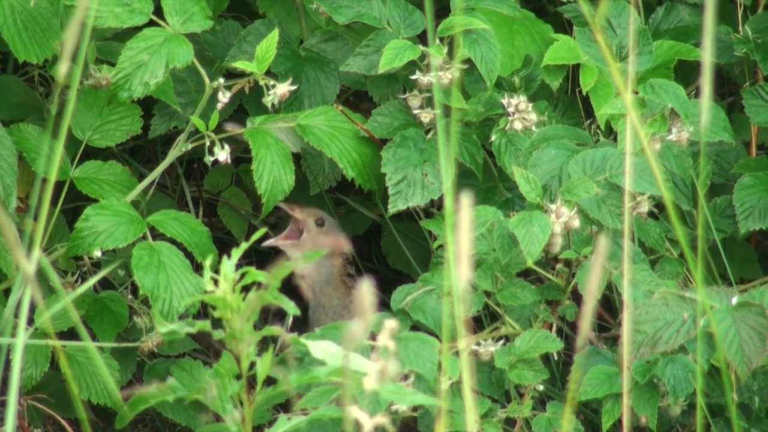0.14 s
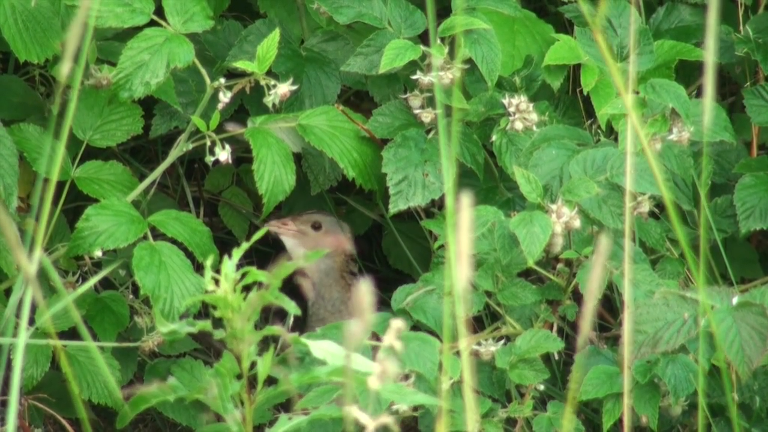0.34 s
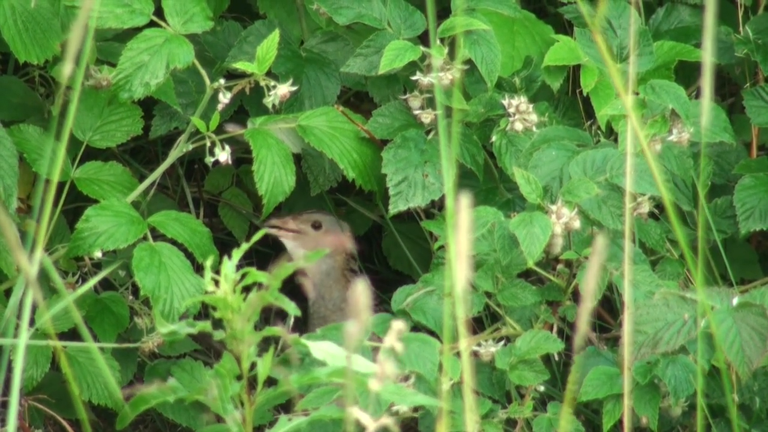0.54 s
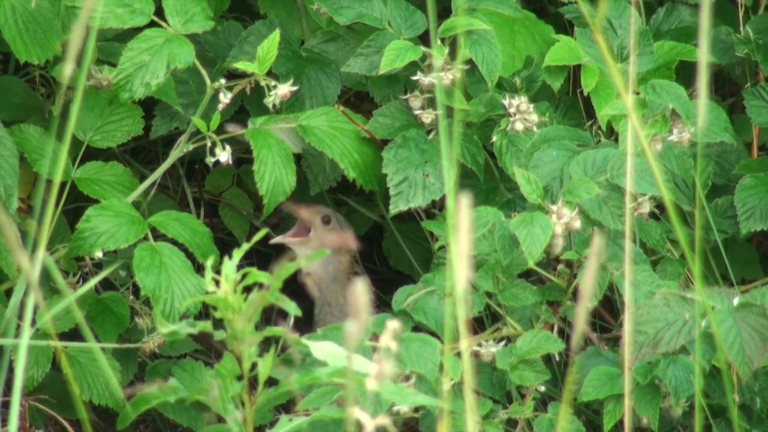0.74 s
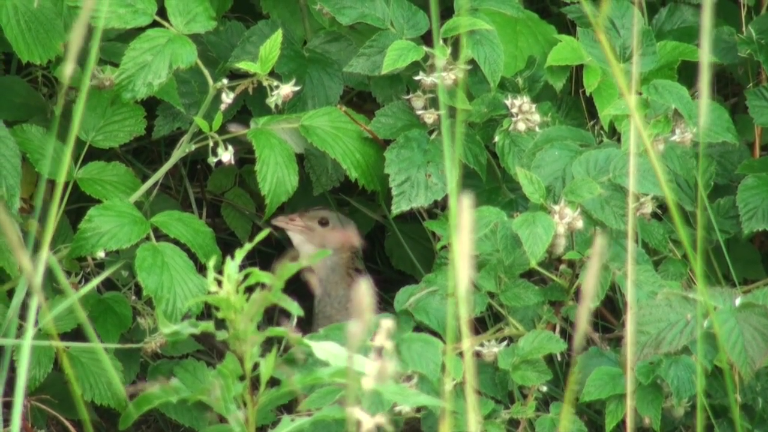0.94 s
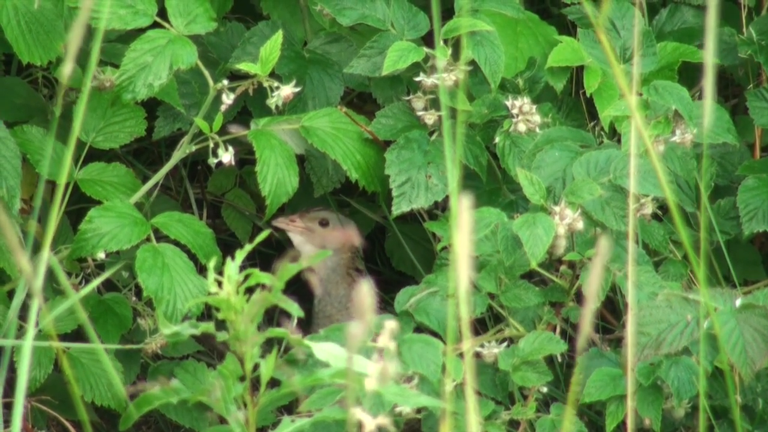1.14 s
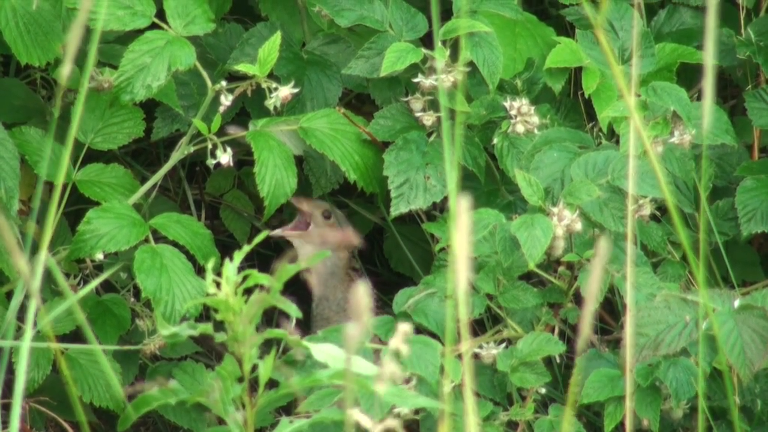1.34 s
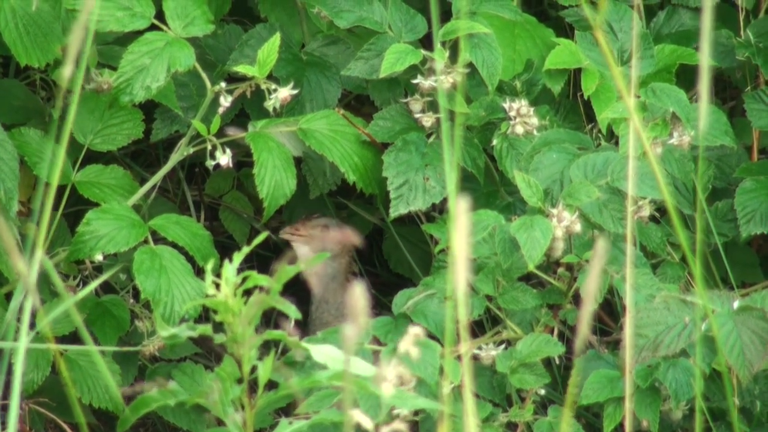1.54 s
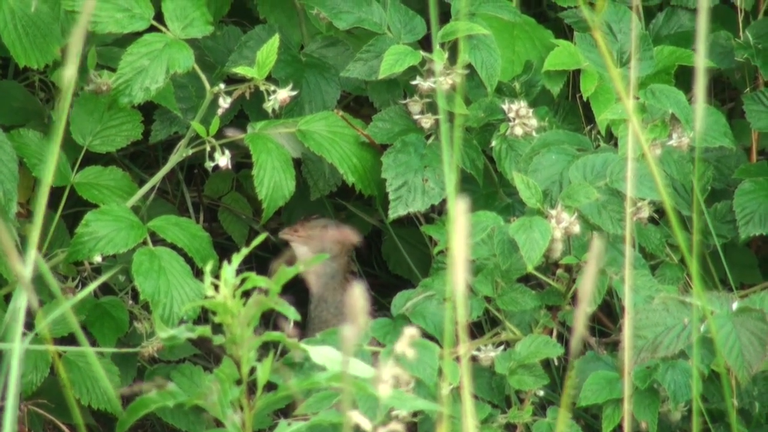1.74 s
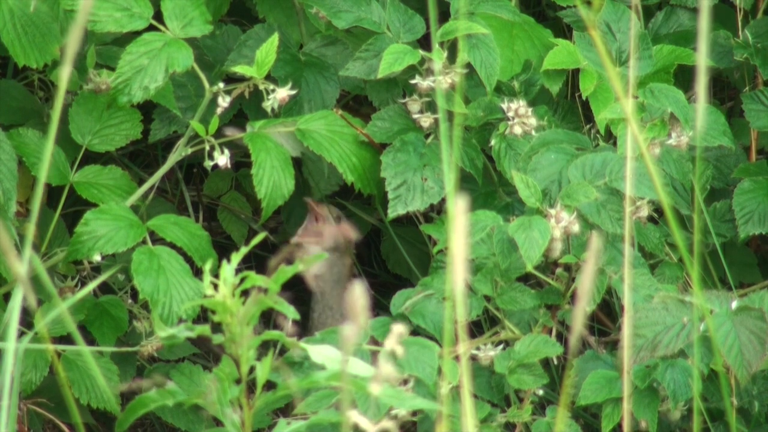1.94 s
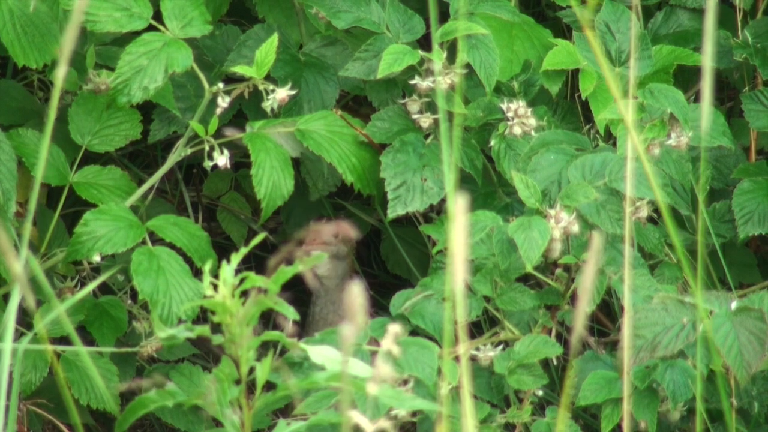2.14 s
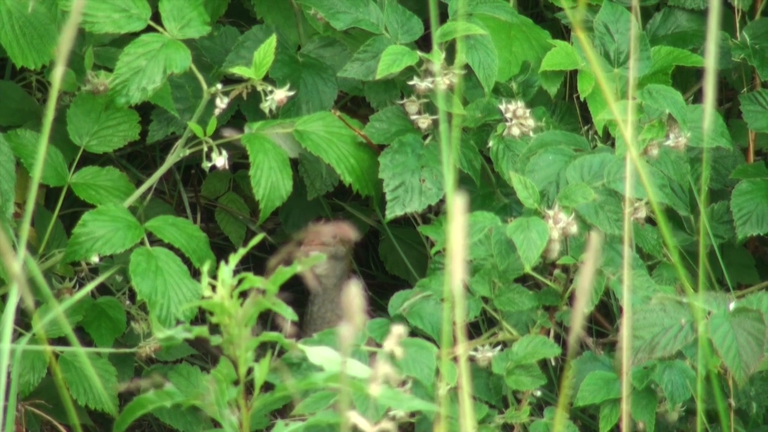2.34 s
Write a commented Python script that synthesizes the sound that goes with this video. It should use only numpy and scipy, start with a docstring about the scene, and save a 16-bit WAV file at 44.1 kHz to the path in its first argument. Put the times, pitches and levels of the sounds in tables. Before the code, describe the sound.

Four loud dry rattling calls, each a quick train of bright clicks like a thumbnail drawn along a comb, from a bird in brambles near the microphone; faint distant answers, thin late chirps, quiet wind and traffic haze.

```python
"""Bramble patch outdoors: a rail close by calls four rasping syllables; a second one answers far off.
Each syllable is an uneven train of pulses, each pulse a sum of brief partials from a few cycles
near 1 kHz up to a bright click, with a little air noise.
Small songbirds whistle faintly as gliding sines over a soft noise haze and a mains hum."""
import sys
import numpy as np
from scipy import signal
from scipy.fft import rfft, irfft
from scipy.io import wavfile
from scipy.ndimage import uniform_filter1d

SR = 44100
rng = np.random.default_rng(int(sys.argv[2]) if len(sys.argv) > 2 else 0)


def attenuation_scalar(level_db):
    """Turn a level in dB into a linear amplitude multiplier (20 dB per decade)."""
    decades = np.asarray(level_db, float) / 20
    return 10 ** decades


def int16_out(signal):
    """Quantize to a 16-bit WAV file."""
    q = np.round(np.clip(np.atleast_2d(signal).T, -1, 1) * 32767)
    wavfile.write(sys.argv[1], SR, q.astype(np.int16))


N = 105840
PULSE_SAMPLES = 512
LEAD_MS = .85  # low partials start this long before the click

# Closing pulses of the four syllables. Each row: pulse times in ms after the syllable start, before stretch.
CLOSINGS_MS = [
    [139.3, 149.4, 158.0, 171.0],
    [138.0, 147.8, 154.9, 163.7, 173.4, 181.9, 193.3],
    [139.1, 149.0, 156.8, 166.6],
    [138.4, 147.6, 154.8, 163.6, 173.2, 181.9, 192.7],
]


def evened(x):
    """Scales to unit rms."""
    return x / np.sqrt(np.mean(x ** 2) + 1e-20)


def colour(x, points):
    """Filters the last axis by a (Hz, dB) curve, linear in log frequency."""
    f, db = np.transpose(points)
    hz = np.fft.rfftfreq(x.shape[-1], 1 / SR)
    gain = attenuation_scalar(np.interp(np.log(hz + 1), np.log(f), db))
    return irfft(rfft(x) * gain, x.shape[-1])


def add(mix, start_s, sound):
    """Adds a sound in place, cut at the end of the mix."""
    part = mix[round(start_s * SR):][:len(sound)]
    part += sound[:len(part)]


def wander(length, size):
    """Smoothed noise of unit rms: a slow random level curve."""
    return evened(uniform_filter1d(rng.standard_normal(length), size=size))


def scatter(x, t60_s, turns_hz):
    """Dense echoes dying at t60; three tails take turns so that like pulses get unlike echoes."""
    t, out = np.arange(SR) / SR, np.zeros(len(x))
    for k in range(3):
        tail = rng.standard_normal(len(t)) * attenuation_scalar(-60 * t / t60_s) * (t > .0015)
        turn = turns_hz * np.arange(len(x)) / SR + k / 3
        share = np.sqrt(2 / 3) * np.cos(2 * np.pi * turn)
        out += signal.fftconvolve(x * share, tail / np.linalg.norm(tail))[:len(x)]
    return out


def haze():
    """Distant wind and traffic, slowly swelling, nearly alike on both sides; wavering hum and low murmur."""
    # Haze spectrum. Each row: frequency in Hz, density in dB per Hz (relative).
    haze_curve = [(20, -12), (70, -6.5), (120, -10), (200, -6), (450, 0.5), (800, -2.5), (1200, -6.5),
                  (2200, -18.5), (4000, -13.5), (6500, -17.5), (8000, -24), (15300, -29), (16500, -57.5)]
    # Left-right difference under the haze. Each row: frequency in Hz, gain in dB.
    apart = [(30, -1), (120, -10), (300, -39), (1000, -27), (6000, -23), (12000, -5)]
    haze_db, swell_db = -50.5, .8
    hum_hz, hum_db, hum_waver_db = 50, -57.5, 2
    murmur_hz, murmur_db, murmur_waver_db = 461.4, -66.5, 7.5

    a, b, c = rng.standard_normal((3, N))
    mid = attenuation_scalar(haze_db + swell_db * wander(N, 5000)) * evened(colour(a, haze_curve))
    side = attenuation_scalar(haze_db) * colour(evened(colour(b, haze_curve)), apart)
    band = [(murmur_hz - 60, -40), (murmur_hz, 0), (murmur_hz + 60, -40)]
    mid = mid + attenuation_scalar(murmur_db + murmur_waver_db * wander(N, 6000)) * evened(colour(c, band))
    hum = np.sin(2 * np.pi * hum_hz * np.arange(N) / SR)
    hum = hum * attenuation_scalar(hum_db + hum_waver_db * wander(N, 4000))
    hum_sides = attenuation_scalar(np.array([[.6], [-.6]]))  # slightly louder on the left
    return np.array([mid + side, mid - side]) + hum * hum_sides


def songbirds():
    """Short gliding whistles that flicker in level, and one rough churr of band noise, lightly echoed."""
    # Each row: start in seconds, length in seconds, from Hz, to Hz, level in dB before a x1.2 gain.
    whistles = [(1.199, .025, 4470, 4340, -62), (1.743, 0.028, 3040, 3080, -52),
                (1.828, 0.012, 5400, 5570, -59), (1.842, 0.058, 2940, 3010, -57),
                (1.845, .022, 4550, 4700, -54), (1.892, 0.016, 4750, 4360, -51),
                (2.148, 0.05, 5140, 4010, -42), (2.258, 0.038, 4750, 4620, -51),
                (2.275, 0.046, 3130, 1910, -52.5), (2.294, 0.017, 4720, 4760, -41),
                (2.318, 0.018, 5240, 5500, -51), (2.338, .009, 5540, 5570, -50),
                (2.325, 0.048, 3150, 1695, -53), (2.352, 0.045, 5560, 4530, -46.5)]
    # Churr spectrum. Each row: frequency in Hz, gain in dB.
    churr_curve = [(3000, -36), (3500, -2), (3850, -9), (4250, -0.5), (4700, -36.5)]
    warble_db, wet_db, t60_s = 3.5, -11, .1
    churr_start_s, churr_length_s, churr_db = 1.774, .038, -41.5

    out, t = np.zeros(N), np.arange(SR // 10) / SR
    for start_s, length_s, from_hz, to_hz, db in whistles:
        u = np.minimum(t / length_s, 1)
        turns = np.cumsum(from_hz + (to_hz - from_hz) * u) / SR
        level = attenuation_scalar(db + warble_db * wander(len(t), 110))
        swell = np.sqrt(abs(np.sin(np.pi * u ** 1.4)))
        add(out, start_s, 1.2 * level * swell * np.sin(2 * np.pi * turns))
    churr = evened(colour(rng.standard_normal(len(t)), churr_curve))
    swell = np.sin(np.pi * np.minimum(t / churr_length_s, 1) ** 0.59)
    add(out, churr_start_s, attenuation_scalar(churr_db) * churr * swell)
    return out + attenuation_scalar(wet_db) * scatter(out, t60_s, turns_hz=2.8)


def pulse(db, treble_db, tune, firm):
    """Low partials swell and stop, pitch creeping up; a bright click rings on, late when dull; air rasps along."""
    # Each row: frequency in Hz, level in dB, rise in ms, fall in ms, share of the treble change (0 to 1).
    partials = [(162, -25.5, 1.4, 0.35, 0.064), (1059, -10.5, 0.99, 3.38, .05),
                (2088, -0.27, 1.51, 2.61, 0.02), (3080, -14, .9, 3.13, 0.072),
                (4060, -12.5, 0.67, 2.9, 0.17), (4520, -17, 1, 3.4, 0.42), (5140, -10, .2, .35, 1),
                (5728, -6.5, 0.21, 2.65, .8), (6186, 3, 0.17, 0.32, 0.89), (6520, -12.5, 0.37, 2.2, 0.92),
                (7070, -17.5, 0.17, 1.4, .8), (8050, -26, 0.47, 1.4, 0.9), (9166, -22.5, 0.56, 1.64, 0.9),
                (10360, -21.5, .35, 1.4, 0.73), (12900, -35.5, .3, 1, 1), (14200, -37, .3, 1.2, 0.84)]
    # Colour of the air noise. Each row: frequency in Hz, density in dB per Hz (relative).
    air_curve = [(350, -79), (600, -51), (984, -2), (1590, -20), (1800, 7), (2090, 5), (2720, 6),
                 (3080, -35), (3530, -63), (4050, -14), (4780, -21.5), (6370, -21), (7620, -41),
                 (9360, -15), (16000, -21.5)]
    rasp_db, rasp_ms = -23, 1.6
    pitch_spread, level_spread_db = .005, .7
    phase_spread, treble_phase_spread = .12, .5  # radians; radians per ms of fall
    glide_per_ms = .068  # fractional pitch rise of a low partial when firm; half of it when not
    dull_db, lag_ms_per_db = -5, .35  # treble below dull_db delays the click
    short_share = .3  # low partials are this much shorter when not firm

    ms = np.arange(PULSE_SAMPLES) * 1000 / SR
    hz, part_db, rise_ms, fall_ms, share = np.transpose(partials)[:, :, None]
    low = 1 - share
    luck = rng.standard_normal((3, len(partials), 1))

    pitch_hz = hz * (1 + low * tune + pitch_spread * (luck[0, 0] + luck[0] / 2))
    glide = low * glide_per_ms * (1 + firm) / 2
    turns = pitch_hz * (ms + glide * (ms - 5) * ms / 2) / 1000

    delay_ms = share * (LEAD_MS - lag_ms_per_db * min(treble_db - dull_db, 0))
    age = np.maximum(ms - delay_ms, 0) / (1 - short_share * low * (1 - firm))
    onset = (age / rise_ms) ** 2
    decay = np.exp(-(age / (rise_ms + fall_ms)) ** (3 - 2 * share))  # low stops, treble rings on
    shape = onset / (1 + onset) * decay
    shape = shape / shape.max(1)[:, None]

    phase = (phase_spread + treble_phase_spread * share ** 2 * fall_ms) * luck[2]
    level = attenuation_scalar(part_db + share * treble_db + level_spread_db * luck[1])
    tone = level * shape * np.cos(2 * np.pi * turns + phase)
    air = evened(colour(rng.standard_normal(PULSE_SAMPLES), air_curve))
    air = air * ms / rasp_ms * np.exp(1 - ms / rasp_ms)
    return attenuation_scalar(db) * (tone.sum(0) + attenuation_scalar(rasp_db) * air)


def syllable(stretch, k):
    """Opening rhythm, then closing k; pitch drifts up and drops on the last pulse, pulses grow firmer."""
    # Rhythm that opens every syllable: pulse times in ms after the start, before stretch.
    opening_ms = [.7, 7.0, 14.1, 23.8, 31.5, 40.1, 50.3, 56.8, 66.2, 73.6, 81.6, 91.4, 97.9, 107.1, 114.1,
                  122.4, 131.7]
    # Accents of the opening pulses. Each row: level in dB, treble in dB.
    accents = [(.5, -8.5), (2.5, -5.5), (-.5, 0), (-1.3, 1), (-1.3, 0), (-1.3, 1), (-1, 1), (.5, -4),
               (0, 1), (0, 0), (.5, 0), (0, 0), (.5, -5), (.3, 0), (.5, -4), (.5, -.5), (0, 0)]
    # Accents of each closing's pulses, one list per closing. Each row: level in dB, treble in dB.
    closing_accents = [
        [(0, -1), (0, 0), (-1.5, -2), (-12, -3)],
        [(.5, -2), (0, 0), (.5, -2), (-.5, 0), (-.5, 0), (-1, -2), (-3, -2)],
        [(0, -1), (0, 0), (-.5, -2), (-1.5, -1)],
        [(0, -2), (0, 0), (.5, -2), (-.5, 0), (-.5, 0), (-.5, -2), (-4, -2)],
    ]
    # Dips between the partials. Each row: frequency in Hz, gain in dB.
    throat_cut = [(260, 0), (340, -14), (620, -14), (800, 0), (1250, 0), (1500, -2), (1720, 0), (3200, 0),
                  (3400, -9), (3750, -9), (3900, 0), (4600, 0), (4800, -5), (5050, 0), (7300, 0),
                  (7600, -9), (7900, 0)]
    time_spread_ms, firm_ms = .05, 90
    drift_per_ms, last_drop = .00018, .11  # fractions of the pitch

    out = np.zeros(SR // 4)
    times_ms = opening_ms + CLOSINGS_MS[k]
    for ms, (db, treble_db) in zip(times_ms, accents + closing_accents[k]):
        tune = drift_per_ms * (ms - 90) - last_drop * (ms == CLOSINGS_MS[k][-1])
        firm = 1 - np.exp(-ms / firm_ms)
        at_ms = 1 + stretch * ms + time_spread_ms * rng.standard_normal()  # 1 ms of room, cut below
        add(out, at_ms / 1000, pulse(db, treble_db, tune, firm))
    fade = np.minimum(np.arange(len(out))[::-1] / PULSE_SAMPLES / 3, 1) ** 2
    return (fade * colour(out, throat_cut))[SR // 1000:]


def far_rail():
    """The same kind of syllable, thinned and smeared by distance."""
    # Each row: start in seconds, level in dB before dry gain and swell, fade in dB per second.
    calls = [(.022, -37, -19), (1.236, -36.5, -26), (1.917, -38, -2)]
    # Distance colour. Each row: frequency in Hz, gain in dB.
    distance = [(900, -16), (2000, -25.5), (2700, -53), (3300, 5.5), (4200, -7), (5200, 2), (5800, -12.5),
                (6400, 1.4), (7600, -11.5), (8300, -20)]
    swell_s, t60_s, dry_db = .057, .27, -6.5

    voice, t = np.zeros(N), np.arange(SR // 4 - SR // 1000) / SR
    for start_s, db, fade_db in calls:
        call = evened(colour(syllable(0.92, 1), distance))
        swell = 1 - 0.55 * np.exp(-t / swell_s)
        add(voice, start_s, attenuation_scalar(db + fade_db * t) * swell * call)
    return attenuation_scalar(dry_db) * voice + scatter(voice, t60_s, turns_hz=13)


def near_rail():
    """Four syllables, their echoes, and the slow baseline swing each causes in the microphone."""
    # Each row: start in seconds, stretch of the rhythm (factor).
    calls = [(.1747, 1.004), (.6944, .997), (1.4287, 1.0), (1.9437, 1.004)]
    # Each row: syllable level in dB, baseline jump in dB.
    efforts = [(-6.5, -29), (-6.5, -30.5), (-6.5, -29), (-7, -30)]
    # Foliage close by scatters mostly treble. Each row: frequency in Hz, gain in dB.
    leaves = [(800, -11), (2100, -8), (3500, 1.5), (6000, -2.5), (12000, 4.5)]
    # Long tail from the hedges around. Each row: frequency in Hz, gain in dB.
    field = [(700, -28), (1500, -24), (2500, -7.5), (4000, 3), (6300, 6), (7500, -4), (12000, -23)]
    leaves_db, leaves_t60_s = -6, .043
    field_db, field_t60_s = -34, .82
    jump_s, jump_rise_s, recover_s = .0068, .00085, .098
    sag_share, sag_bend = .32, .59  # baseline ends this share of the jump below zero

    voice, swing, t = np.zeros(N), np.zeros(N), np.arange(SR // 2) / SR
    for k, ((start_s, stretch), (db, jump_db)) in enumerate(zip(calls, efforts)):
        add(voice, start_s - LEAD_MS / 1000, attenuation_scalar(db) * syllable(stretch, k))
        length_s = CLOSINGS_MS[k][-1] / 1000 + 0.014
        jump = attenuation_scalar(jump_db) / (1 + np.exp((jump_s - t) / jump_rise_s))
        sag = 1 - (1 + sag_share) * np.minimum(t / length_s, 1) ** sag_bend
        recovery = np.exp(-np.maximum(t - length_s, 0) / recover_s)
        add(swing, start_s, jump * sag * recovery)
    near_echo = attenuation_scalar(leaves_db) * colour(scatter(voice, leaves_t60_s, turns_hz=3.306), leaves)
    long_echo = attenuation_scalar(field_db) * colour(scatter(voice, field_t60_s, turns_hz=7.8), field)
    return voice + swing + near_echo + long_echo


def scene():
    """Stereo haze with the birds in the centre."""
    return haze() + songbirds() + far_rail() + near_rail()


def top_cut(x):
    """Nothing passes above the cut-off."""
    return signal.sosfilt(signal.butter(12, 16660, fs=SR, output="sos"), x)


def record(dry):
    """Soft overload at full scale, then a band limit."""
    held = dry / (1 + abs(dry) ** 6) ** (1 / 6)
    low_pass = signal.firwin(511, 15600, fs=SR)
    mix = signal.oaconvolve(held, low_pass[None], "same")
    return top_cut(mix)


dry = scene()
out = record(dry)
int16_out(out)
```